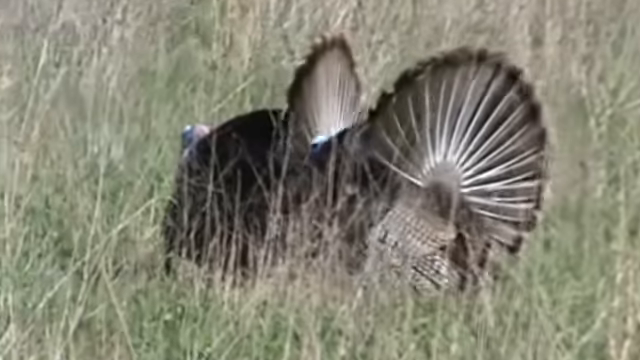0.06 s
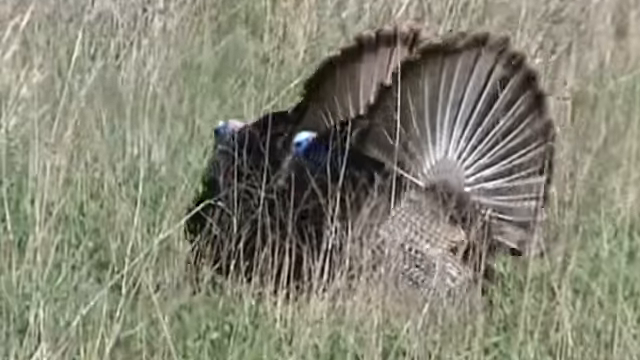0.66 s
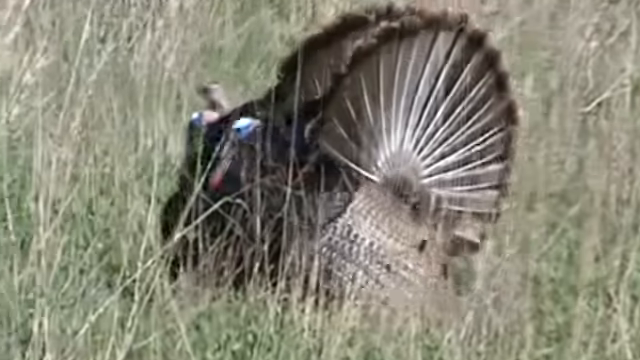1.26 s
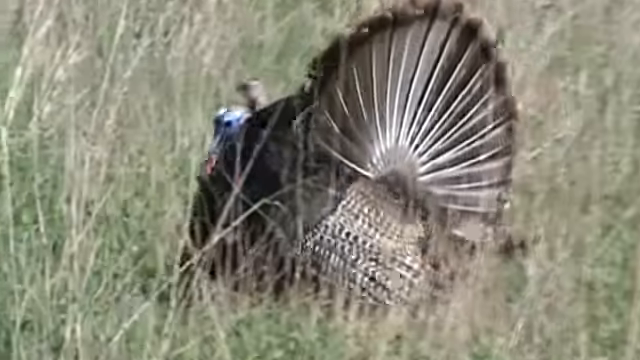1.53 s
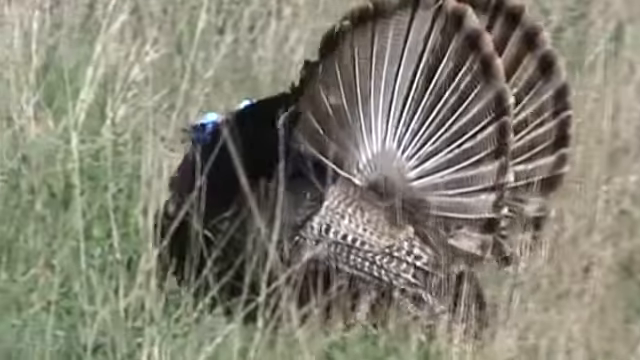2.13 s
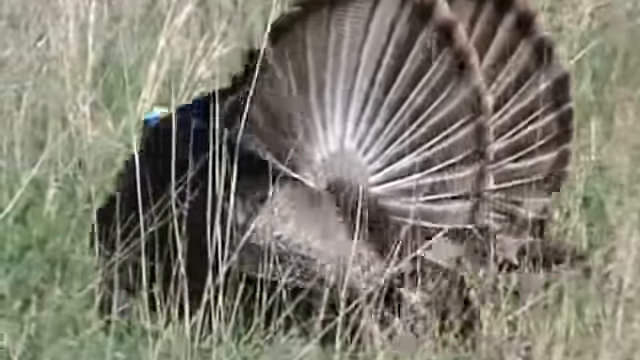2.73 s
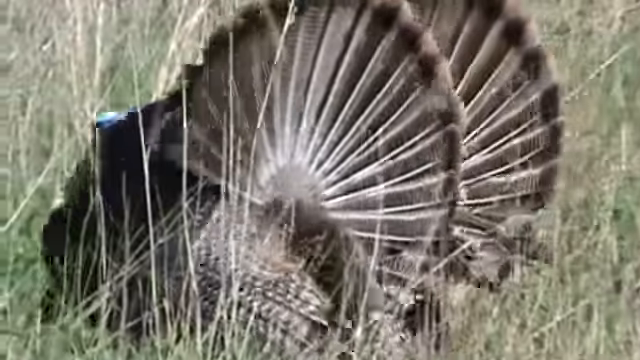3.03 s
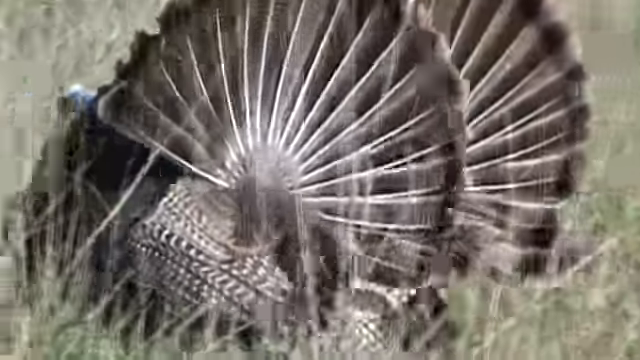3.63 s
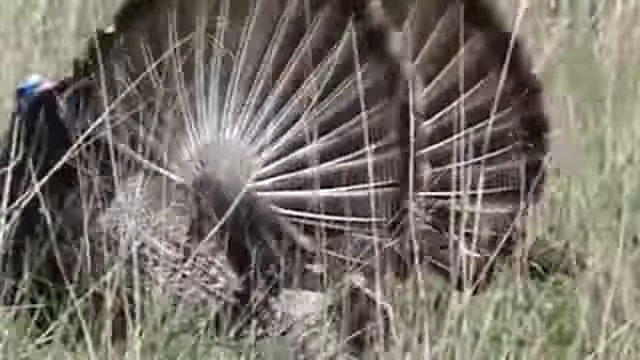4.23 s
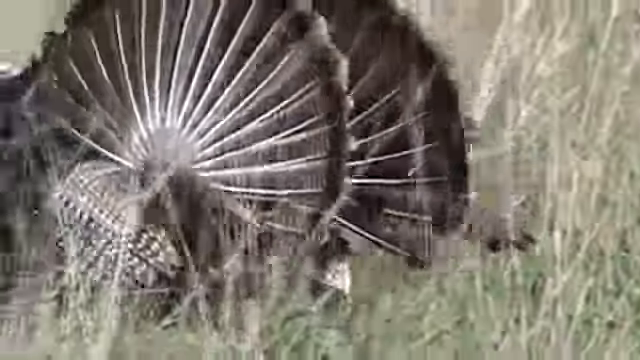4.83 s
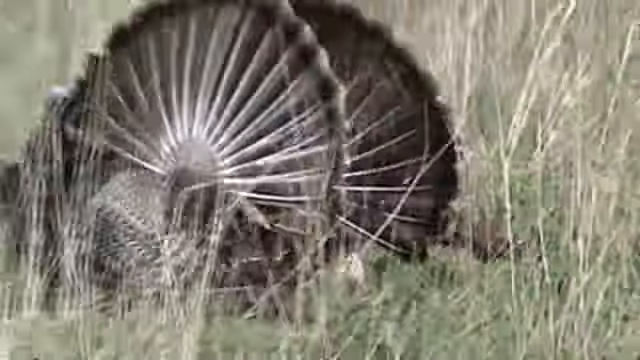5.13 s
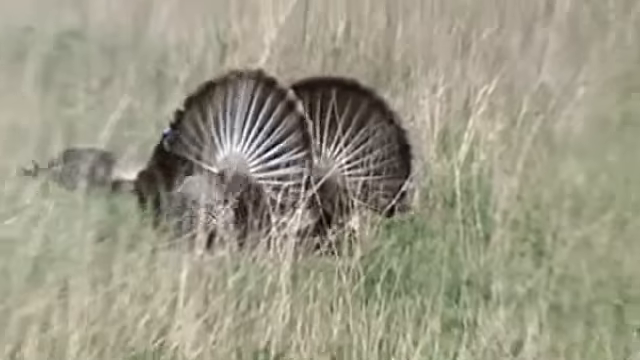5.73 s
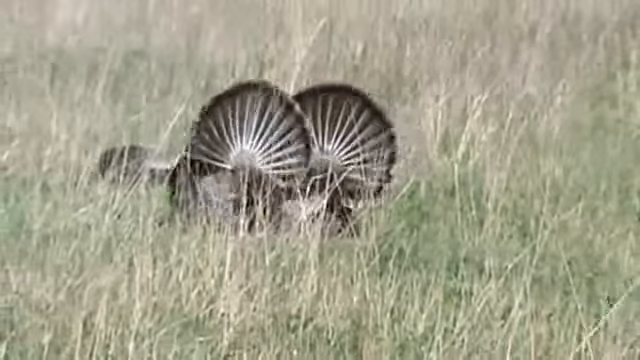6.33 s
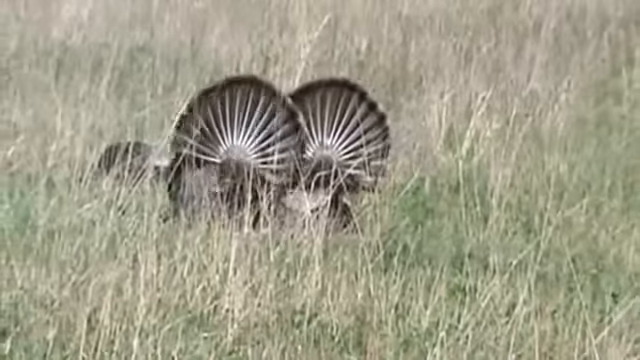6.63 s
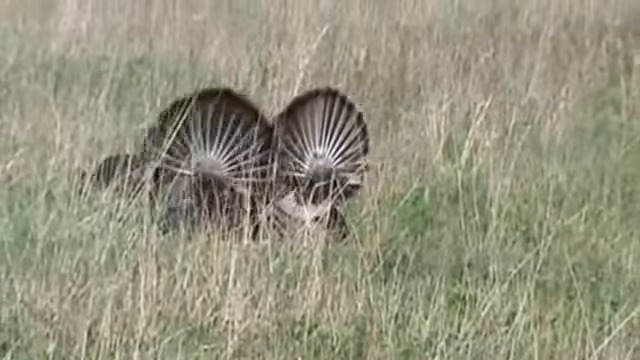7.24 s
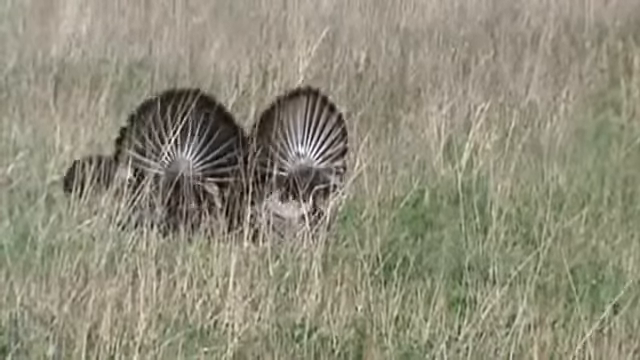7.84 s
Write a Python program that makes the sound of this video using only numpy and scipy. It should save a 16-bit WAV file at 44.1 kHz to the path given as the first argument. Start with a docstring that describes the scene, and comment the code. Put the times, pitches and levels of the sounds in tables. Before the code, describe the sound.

Wind rumbles on the microphone in a field as a wild turkey gives two short yelps and distant songbirds whistle and trill.

```python
"""Wind rumbles on the microphone as a camera control clicks and the zoom motor whines faintly.
Further off, songbirds chip, whistle and sing a rapid trill in nearly pure tones.
A wild turkey in the grassy field gives two short yelps between softer, hoarse notes:
syrinx harmonics shaped by throat and windpipe. The gusts grow, and one sharp snap sounds close by."""
import sys
import numpy as np
from scipy import signal
from scipy.fft import rfft, irfft, next_fast_len
from scipy.io import wavfile
from scipy.ndimage import uniform_filter1d

SR = 44100
rng = np.random.default_rng(int(sys.argv[2]) if len(sys.argv) > 2 else 0)


def file_out(sig):
    """Save sig as 16-bit WAV at sys.argv[1]."""
    # one column per channel
    cols = np.atleast_2d(sig).T
    # limit, then scale
    lim = np.clip(cols, -1, 1)
    pcm = np.round(lim * 32767).astype(np.int16)
    wavfile.write(sys.argv[1], SR, pcm)


N = 356328
TIME_S = np.arange(N) / SR

# noise colours: (frequency [Hz], relative density [dB])
AIR_SPECTRUM = [(120, -25), (200, -6.5), (397, -7), (602, -7.5), (659, -7), (721, -8), (1950, -13),
                (2460, -15), (3120, -17), (6080, -21), (6420, -20.5), (7020, -21.5), (15000, -23)]
RUMBLE_SPECTRUM = [(8, -36), (20, -10.5), (45, 0), (80, -0.5), (100, -6.5), (130, -7.5), (250, -73)]
BREEZE_SPECTRUM = [(50, -8), (85, -9), (110, -5), (170, -2.5), (220, -12), (350, -22), (600, -53)]
GUST_SPECTRUM = [(50, -23), (85, -6), (110, 3), (150, 2), (200, -4.5), (260, -15.5), (330, -17), (450, -39),
                 (800, -46), (2000, -80)]
GEAR_SPECTRUM = [(1000, 0), (3000, 3.5), (5300, 2.5), (5750, 7), (6100, 3), (8000, 1.5), (8400, 4),
                 (9000, 1.5), (15000, -2.5)]
TICK_SPECTRUM = [(500, 0), (2000, 2), (4200, -4.5), (6000, 4), (8000, -5), (10300, -3), (11500, -9),
                 (14000, -19)]
# likeness at the two microphone ports: (frequency [Hz], correlation [-1..1])
AIR_CORRELATION = [(200, 0.78), (350, 0.27), (550, -.25), (1000, -0.24), (2000, -0.073), (4000, 0.45),
                   (8000, 0.85), (11000, 0.82), (14000, 1)]
BREEZE_CORRELATION = [(80, 1), (170, 1), (300, 0.3)]
WIND_CORRELATION = [(20, .93), (45, 0.95), (85, 0.81), (125, 0.72), (180, 0.19), (400, 0.051)]
# open air and microphone hiss: (time [s], level [dB])
AIR_LEVELS = [(0, -54), (2.2, -54.5), (3.7, -54), (4.2, -53), (6.5, -53.5), (8.08, -53)]
# breeze between gusts: (time [s], relative flutter [dB], relative rumble [dB])
BREEZE_LEVELS = [(0, -54, -54), (1.3, -55.5, -54.5), (1.9, -58.5, -63.5), (2.65, -59.5, -54.5),
                 (3.05, -57.5, -62.5), (3.7, -58.5, -52), (4.35, -48.5, -43.5), (4.9, -46, -46),
                 (5.25, -58.5, -49), (5.8, -59, -56), (6.25, -51.5, -48.5), (6.65, -57, -52),
                 (7.6, -57.5, -51), (8.08, -51, -46)]
# gusts: (peak time [s], length [s], relative flutter [dB], relative rumble [dB])
GUSTS = [(.175, .06, -50, -51.5), (0.517, 0.12, -59, -49), (1.106, .07, -63, -47.5),
         (1.25, .07, -62, -46.5), (1.417, .06, -51, -49), (3.31, .05, -60, -49.5), (3.45, .05, -57, -51),
         (3.89, .15, -48.5, -42.5), (4.077, 0.054, -41.5, -44), (4.14, .06, -42, -45),
         (4.515, 0.099, -41.5, -40.5), (4.665, .14, -37, -35.5), (4.77, 0.069, -34.5, -40),
         (4.853, 0.062, -34, -42), (4.95, .05, -35.5, -39), (5.06, .07, -35, -37.5), (5.49, .08, -44, -41),
         (5.58, .06, -54, -45.5), (6.067, 0.081, -44.5, -38.5), (6.33, .1, -46.5, -44),
         (6.55, .05, -54, -53), (6.71, .08, -53.5, -45.5), (6.82, .06, -41.5, -41), (7.28, .09, -47, -42.5),
         (7.805, 0.055, -36, -32.5), (7.883, .06, -35, -40), (7.94, 0.067, -41.5, -37.5),
         (8.055, .08, -36.5, -40)]
# single eddies striking the microphone: (time [s], peak [dB], frequency [Hz], half length [s])
BUFFETS = [(.495, -31, 58.6, 0.014), (1.43, -36.5, 90, 0.021), (4.068, -27.5, 84.6, 0.0088),
           (4.859, -19, 78.5, .006), (5.05, -24.5, 199, 0.0029), (6.073, -30, 100, 0.0086)]

# zoom motor runs: (start [s], end [s], whine [dB], gear hiss [dB])
ZOOM_RUNS = [(0, 3.79, -70, -82.5), (4.74, 6.375, -71, -62.5)]
# control clicks: (time [s], tick gain [dB], knock gain [dB])
CLICKS = [(0.122, -31.5, -40.5), (3.7888, -37.5, -69), (4.741, -40, -59), (6.375, -37, -68),
          (7.3874, -35.5, -41.5)]
# camera shell: (frequency [Hz], relative level [dB], t60 [s])
SHELL_MODES = [(957, 4, .017), (2060, 0.5, 0.0072), (3450, -5.5, .006)]
# ring of the snap: (frequency [Hz], relative level [dB], t60 [s], left-right [dB])
SNAP_MODES = [(960, -8.5, 0.013, 4), (1450, -14, 0.012, 10), (2240, -12.5, 0.016, 14.5),
              (3490, -2, 0.011, 2), (4130, -9.5, 0.016, 0), (5500, -1.5, 0.014, 7), (6880, 10.5, 0.0039, 3),
              (7800, 2.5, 0.012, 0), (9520, 7, 0.0071, -5), (11070, 9.5, 0.0031, 8),
              (13100, -2, 0.0093, -3)]

# short note contours: (time offset [s], pitch [ratio], relative level [dB])
PIP_SHAPE = [(-.016, 0.96, -14), (0, 1, 7), (.018, 1, 0)]
CHIP_SHAPE = [(-.012, .82, -11), (-.005, .93, -2), (.002, 1.005, 1), (.007, 1.04, -3), (.011, 1.05, -12)]
SLUR_SHAPE = [(-.015, 1.1, -11), (-.006, 1.05, -0.5), (.003, .98, -1.5), (.012, .93, -2), (.02, .89, -16)]
TRILL_SHAPE = [(-.04, .895, -24), (-.026, .94, -5), (-.012, .98, -4.3), (0, 1, -5), (.007, .975, -4.5),
               (.013, .91, -7.5), (.021, .83, -13), (.034, .765, -16), (.042, .76, -26)]
# whistles: (start [s], length [s], held pitch [Hz], onset pitch [ratio], level [dB], left-right [dB])
WHISTLES = [(.88, .17, 2467, .99, -67.5, 3), (1.3, 0.16, 2450, 0.95, -65, 0),
            (1.724, 0.13, 2445, 0.91, -65, -1), (2.532, .11, 2900, .99, -70.5, 7),
            (2.6, 0.12, 2510, 1.02, -69, 3), (2.867, .24, 3985, .955, -71.5, 0),
            (3.226, .19, 4000, 1, -65.5, 0), (3.497, 0.14, 3980, .96, -64, 1),
            (4.029, 0.25, 3290, 1.07, -68.5, 12), (4.14, .16, 2450, 1.01, -69, 2),
            (4.406, 0.21, 3280, 1.08, -66.5, 17), (4.496, 0.23, 2445, 1.01, -67, 2),
            (4.725, 0.21, 3295, 1.08, -66.5, 19), (6.292, .22, 2454, 0.85, -59.5, 4),
            (6.681, .26, 2455, 0.82, -60, 5), (7.549, 0.22, 2580, 0.92, -64.5, 2),
            (7.8, .1, 3100, 1.03, -68, 0), (7.92, 0.26, 2500, 0.94, -62.5, 2)]

# turkey notes, one list each:
# (time [s], pitch [Hz], level [dB], throat resonance [Hz], roughness [0 clean, 1 hoarse])
YELPS = [
    [(3.158, 732, -66, 1600, .7), (3.167, 622, -43, 1490, 0.5), (3.178, 628, -43.5, 1510, .06),
     (3.198, 590, -41.5, 1570, .02), (3.208, 581, -42.5, 1550, .02), (3.223, 602, -43, 1530, 0.05),
     (3.238, 584, -43.5, 1520, 0.1), (3.244, 676, -49, 1450, .2), (3.254, 800, -60, 1550, .3)],
    [(3.492, 657, -58, 1350, .1), (3.508, 690, -58, 1550, 0.83), (3.516, 785, -47, 1650, 0.8),
     (3.523, 632, -45, 1620, 1.02), (3.532, 594, -41, 1440, .3), (3.545, 599.5, -43, 1370, 0.07),
     (3.565, 595, -44.5, 1220, 0), (3.578, 576, -46.5, 1190, .03), (3.588, 675, -57, 1300, 0.1)],
]
MURMURS = [
    [(2.82, 680, -69, 1330, 0.37), (2.91, 664, -63, 1320, .15), (2.95, 620, -55, 1280, .2)],
    [(3.9, 660, -61, 1400, 0.69), (3.96, 800, -56, 1650, 0.99), (4.0, 706, -57, 1450, 0.83)],
]
# upper windpipe resonances: (frequency [Hz], width [Hz], level against the throat [dB])
WINDPIPE_MODES = [(2310, 160, -18.5), (2980, 160, -21.5), (3620, 400, -26.5)]


def gain_of(db):
    """Decibels to amplitude."""
    return 10 ** (np.asarray(db) / 20)


def unit_rms(x):
    """Scale to rms 1."""
    return x / np.sqrt(np.mean(x ** 2) + 1e-20)


def at_hz(points, hz):
    """Interpolate on a log-frequency axis."""
    points_hz, values = np.transpose(points)
    return np.interp(np.log(hz + 1), np.log(points_hz + 1), values)


def at_time(rows, t):
    """Interpolate each value column at times t."""
    times_s, *columns = np.transpose(rows)
    return [np.interp(t, times_s, column) for column in columns]


def add(mix, start_s, sound, pan_db=0):
    """Place a sound in the stereo mix; positive pan is left."""
    part = mix[:, max(round(start_s * SR), 0):][:, :sound.shape[-1]]
    part += sound[..., :part.shape[1]] * gain_of([[pan_db / 2], [-pan_db / 2]])


def wander(size, cutoff_hz):
    """Smooth random drift, rms about 1."""
    length = next_fast_len(size + SR // 4)
    lowpass = np.exp(-(np.fft.rfftfreq(length, 1 / SR) / cutoff_hz) ** 2)
    return unit_rms(irfft(rfft(rng.standard_normal(length)) * lowpass, length))[:size]


def noise(spectrum, correlation, size=N):
    """Stereo noise of given colour and left-right correlation."""
    length = next_fast_len(size)
    hz = np.fft.rfftfreq(length, 1 / SR)
    mid, side = rfft(rng.standard_normal((2, length)))
    likeness = np.clip(at_hz(correlation, hz), -1, 1)
    mid, side = mid * np.sqrt(1 + likeness), side * np.sqrt(1 - likeness)
    coloured = np.array([mid + side, mid - side]) * gain_of(at_hz(spectrum, hz))
    return unit_rms(irfft(coloured, length))[:, :size]


def ring(modes):
    """Decaying sines of a struck object."""
    t = np.arange(SR // 20) / SR
    return sum((-1) ** k * gain_of(db - 60 * t / t60_s) * np.sin(2 * np.pi * hz * t)
               for k, (hz, db, t60_s) in enumerate(modes))


def tone(hz, db, waver=0.0041, flutter_db=1.5):
    """Nearly pure tone, unsteady in pitch and level."""
    cycles = np.cumsum(hz * (1 + waver * wander(len(hz), 70))) / SR
    envelope = gain_of(db + flutter_db * wander(len(hz), 40)) * signal.windows.tukey(len(hz), .1)
    return np.sqrt(2) * envelope * np.sin(2 * np.pi * cycles)


def note_run(notes, shape, pan_db):
    """One contour played at each (time [s], pitch [Hz], level [dB])."""
    out = np.zeros((2, N))
    t = np.arange(shape[0][0], shape[-1][0], 1 / SR)
    bend, swell_db = at_time(shape, t)
    for time_s, hz, db in notes:
        add(out, time_s + t[0], tone(hz * bend, db + swell_db), pan_db)
    return out


def field_scatter(direct, echo_db, t60_s):
    """Add weak, diffuse scatter from grass and distant trees."""
    t = np.arange(SR // 2) / SR
    tail = rng.standard_normal((2, len(t))) * gain_of(-60 * t / t60_s) * (t > .006)
    tail /= np.linalg.norm(tail[0])
    return direct + gain_of(echo_db) * signal.fftconvolve(direct, tail, axes=1)[:, :N]


def air():
    """Steady wash of the field plus microphone hiss."""
    return noise(AIR_SPECTRUM, AIR_CORRELATION) * gain_of(at_time(AIR_LEVELS, TIME_S)[0])


def wind_levels(puff_db=2, puff_hz=11.5, steepness=2.6):
    """Flutter and rumble in dB: flat-topped gusts add their power to a puffing breeze."""
    flutter_db, rumble_db = at_time(BREEZE_LEVELS, TIME_S)
    puffs_db = puff_db * wander(N, puff_hz)
    power = gain_of([flutter_db + puffs_db / 2, rumble_db + puffs_db]) ** 2
    for peak_s, length_s, flutter_db, rumble_db in GUSTS:
        from_peak = np.minimum(abs(2 * (TIME_S - peak_s) / length_s), 10)
        power += gain_of([[flutter_db], [rumble_db]]) ** 2 * np.exp(-from_peak ** steepness)
    return 10 * np.log10(power)


def wind(calm_db=-56, gust_db=-43):
    """Turbulence at the microphone: deep rumble, flutter that widens in gusts, single thumps."""
    flutter_db, rumble_db = wind_levels()
    force = np.clip((flutter_db - calm_db) / (gust_db - calm_db), 0, 1)
    flutter = np.sqrt(1 - force) * noise(BREEZE_SPECTRUM, BREEZE_CORRELATION)
    flutter += np.sqrt(force) * noise(GUST_SPECTRUM, WIND_CORRELATION)
    rumble = noise(RUMBLE_SPECTRUM, WIND_CORRELATION)
    out = np.zeros((2, N))
    for eddies, db in (flutter, flutter_db - 0.7), (rumble, rumble_db + 1.12):
        local_rms = np.sqrt(uniform_filter1d((eddies ** 2).mean(0), size=4000))
        out += gain_of(db) * eddies / local_rms
    t = np.arange(-SR // 10, SR // 10) / SR
    for time_s, db, hz, half_s in BUFFETS:
        thump = np.exp(-(t / half_s) ** 2) * np.cos(2 * np.pi * hz * t)
        add(out, time_s + t[0], gain_of(db) * thump)
    return out


def zoom_motor(whine_hz=6636, waver=0.00368, flutter=0.39, port_lag_rad=1.0):
    """Thin whine and gear hiss while the lens moves; the whine reaches one port later."""
    out = np.zeros((2, N))
    phase = 2 * np.pi * np.cumsum(whine_hz * (1 + waver * wander(N, 158))) / SR
    whine = unit_rms(np.sin([phase, phase - port_lag_rad]) * (1 + flutter * wander(N, 30)))
    gears = noise(GEAR_SPECTRUM, correlation=[(1000, 1.0)])
    for start_s, end_s, whine_db, gear_db in ZOOM_RUNS:
        running = uniform_filter1d(1. * ((TIME_S > start_s) & (TIME_S < end_s)), size=600)
        out += running * (gain_of(whine_db) * whine + gain_of(gear_db) * gears)
    return out


def zoom_pips(rate_per_s=3, hz=5760, db=-74, spread_db=2):
    """Tiny random pips while the lens moves."""
    draws = rng.random((round(rate_per_s * N / SR), 2)) * [N / SR, 1]
    notes = [(time_s, hz, db + spread_db * (2 * strength - 1)) for time_s, strength in draws
             if any(start_s < time_s < end_s for start_s, end_s, _, _ in ZOOM_RUNS)]
    return note_run(notes, PIP_SHAPE, pan_db=-1)


def control_clicks(tick_t60_s=.0135):
    """Controls tick and knock the camera shell."""
    out = np.zeros((2, N))
    knock = ring(SHELL_MODES)
    t = np.arange(len(knock)) / SR
    for time_s, tick_db, knock_db in CLICKS:
        tick = gain_of(tick_db - 60 * t / tick_t60_s) * noise(TICK_SPECTRUM, AIR_CORRELATION, len(t)) / 2
        add(out, time_s, gain_of(knock_db) * knock + tick)
    return out


def snap(time_s=4.4903, gain_db=-21.5, splinter_db=-6.5, splinter_t60_s=0.025, rise_s=0.00044):
    """Something small and hard gives way close by: short ring, spray of splinter noise."""
    out = np.zeros((2, N))
    crack = np.array([ring([(hz, db + side * pan_db / 2, t60_s) for hz, db, t60_s, pan_db in SNAP_MODES])
                      for side in (1, -1)])
    t = np.arange(crack.shape[1]) / SR
    splinters = noise(TICK_SPECTRUM, correlation=[(1000, 0.36)], size=len(t))
    splinters *= gain_of(splinter_db - 60 * t / splinter_t60_s)
    attack = 1 - np.exp(-t / rise_s)
    add(out, time_s, gain_of(gain_db) * (crack + splinters) * attack)
    return out


def whistles(fade_db=8, quaver=0.0076, rise_s=0.0302, sink_s=0.059):
    """Long songbird notes slide onto a held, quavering pitch, swelling and fading."""
    out = np.zeros((2, N))
    for start_s, length_s, held_hz, onset_ratio, db, pan_db in WHISTLES:
        t = np.arange(0, length_s, 1 / SR)
        slide_s = rise_s if onset_ratio < 1 else sink_s
        hz = held_hz * (1 + (onset_ratio - 1) * np.exp(-t / slide_s))
        envelope_db = db - fade_db * (2 * t / length_s - 1) ** 4
        waver = quaver if held_hz < 2700 else quaver / 2  # the lower singer is less steady
        add(out, start_s, tone(hz, envelope_db, waver), pan_db)
    return out


def trill(count=14, opening_count=4, start_s=5.028, opening_gap_s=.1125, gap_s=.1061, fade_db_per_s=2.2):
    """A songbird gains pitch and level, then runs on slightly quicker, slowly fading."""
    k = np.arange(count)
    opening = np.minimum(k, opening_count)
    effort = opening / opening_count
    held_s = (k - opening) * gap_s
    times_s = start_s + opening * opening_gap_s + held_s
    hz = np.interp(effort, [0, 1], [3930, 4060])
    db = np.interp(effort, [0, 1], [-57.5, -48.8]) - fade_db_per_s * held_s
    return note_run(zip(times_s, hz, db), TRILL_SHAPE, pan_db=13)


def paced(start_s, gap_s, hz, db, step_db, count):
    """Evenly spaced notes, each a level step from the last."""
    return [(start_s + k * gap_s, hz, db + k * step_db) for k in range(count)]


def songbirds():
    """Distant singers: a trill, rising chips, falling slurs, whistles."""
    chips = paced(start_s=.184, gap_s=.2055, hz=3720, db=-58, step_db=-0.9, count=5)
    slurs = paced(start_s=4.175, gap_s=.118, hz=3700, db=-62, step_db=2, count=2)
    slurs += paced(start_s=4.39, gap_s=.0885, hz=4220, db=-62.5, step_db=0.2, count=6)
    return (trill() + note_run(chips, CHIP_SHAPE, pan_db=-4)
            + note_run(slurs, SLUR_SHAPE, pan_db=0) + whistles())


def turkey_note(rows, throat_width_hz=620, jitter=0.056, rasp=0.42, rasp_hz=1660):
    """Syrinx harmonics pass a moving throat resonance; roughness cracks the voice."""
    t = np.arange(rows[0][0], rows[-1][0], 1 / SR)
    hz, db, throat_hz, rough = at_time(rows, t)
    rough = np.clip(rough, 0, 1)
    cycles = np.cumsum(hz * (1 + jitter * rough * wander(len(t), 480))) / SR
    k = np.arange(2, 8)[:, None]  # the small throat radiates no fundamental
    throat = 1 / (1 + (2 * (k * hz - throat_hz) / throat_width_hz) ** 2) ** 1.53
    windpipe = sum(gain_of(mode_db) / (1 + (2 * (k * hz - mode_hz) / width_hz) ** 2)
                   for mode_hz, width_hz, mode_db in WINDPIPE_MODES)
    amplitudes = throat / np.linalg.norm(throat, axis=0) + windpipe
    voice = np.sqrt(2) * (amplitudes * np.cos(2 * np.pi * k * cycles)).sum(0)
    rattle = unit_rms(wander(len(t), 200) * np.cos(2 * np.pi * rasp_hz * t))  # uneven membrane flapping
    sound = np.sqrt(1 - rough) * voice + rasp * np.sqrt(rough) * rattle
    return gain_of(db) * sound * signal.windows.tukey(len(t), .05)


def turkey():
    """Two yelps with softer notes around them, slightly left."""
    out = np.zeros((2, N))
    for rows in YELPS + MURMURS:
        add(out, rows[0][0], turkey_note(rows), pan_db=3.5)
    return out


def scene():
    """Birds out in the field; wind, camera and snap close to the microphone."""
    camera = zoom_motor() + zoom_pips() + control_clicks()
    yelps = field_scatter(turkey(), echo_db=-17.5, t60_s=0.47)
    songs = songbirds()
    return air() + wind() + camera + snap() + field_scatter(songs, echo_db=-14.5, t60_s=0.43) + yelps


def record(dry, cutoff_hz=15350):
    """Steep treble band limit."""
    lowpass = signal.firwin(511, cutoff_hz, window=("kaiser", 9), fs=SR)
    return signal.oaconvolve(dry, lowpass[None], "same")


dry = scene()
out = record(dry)
file_out(out)
```